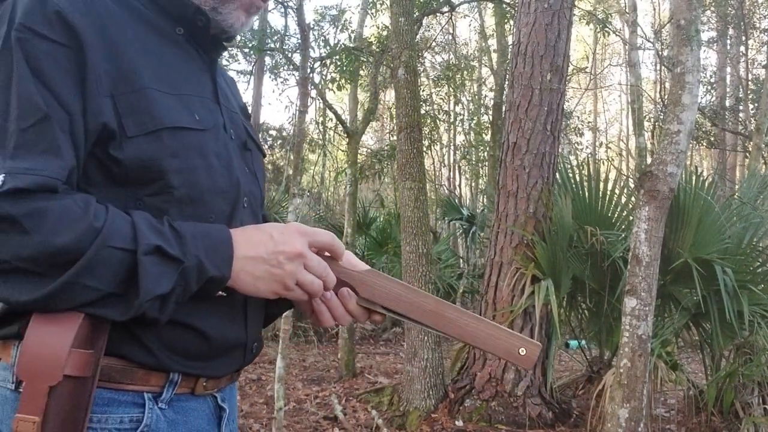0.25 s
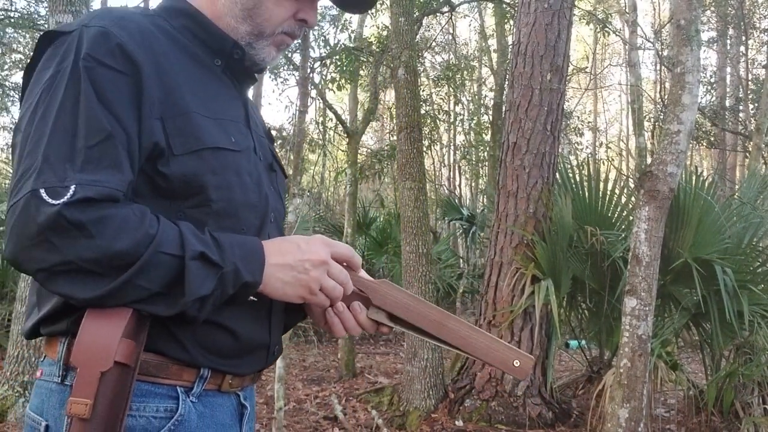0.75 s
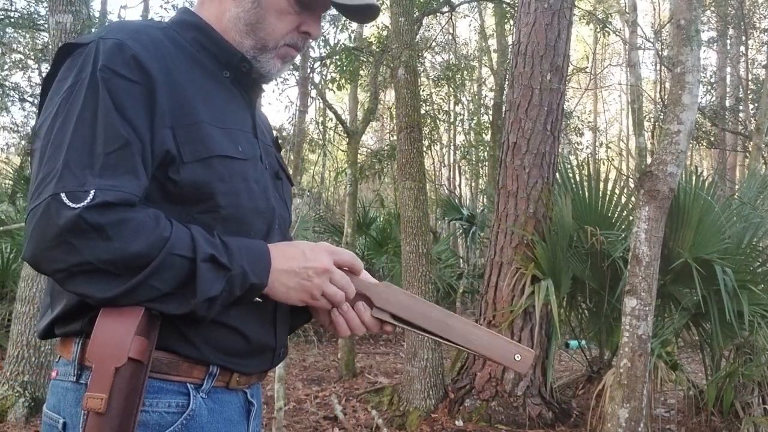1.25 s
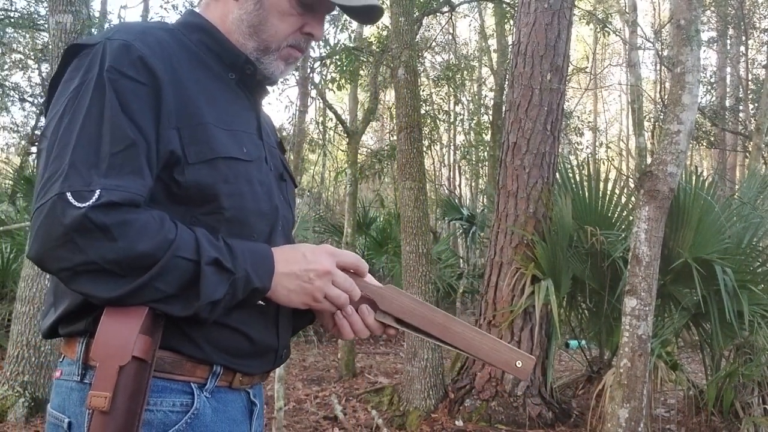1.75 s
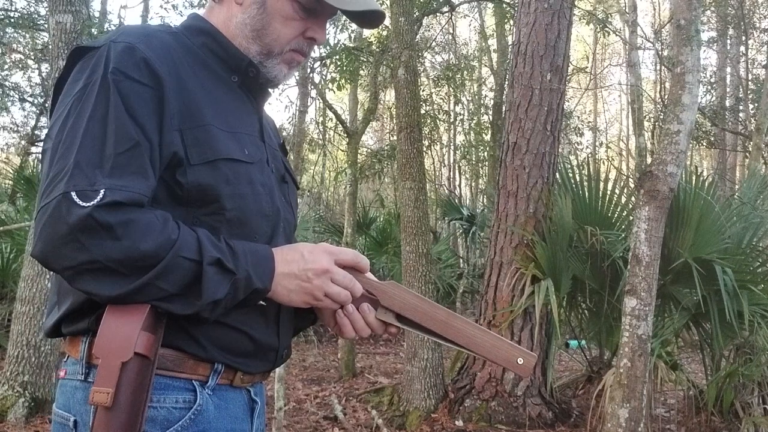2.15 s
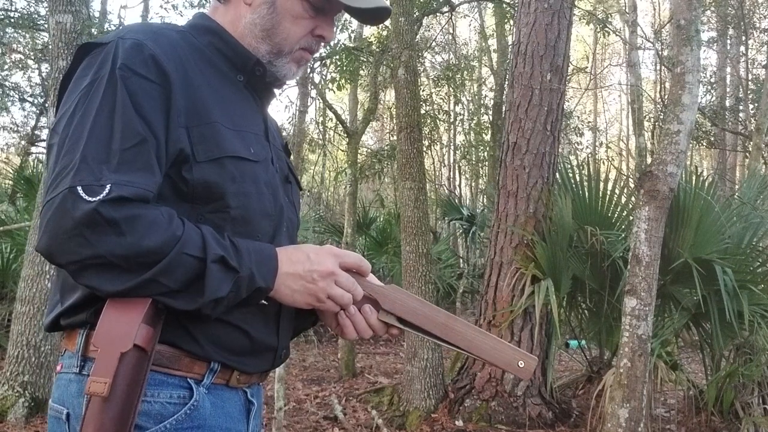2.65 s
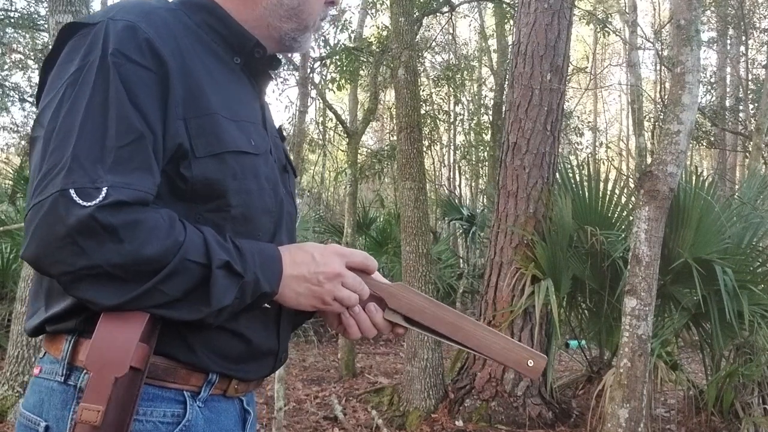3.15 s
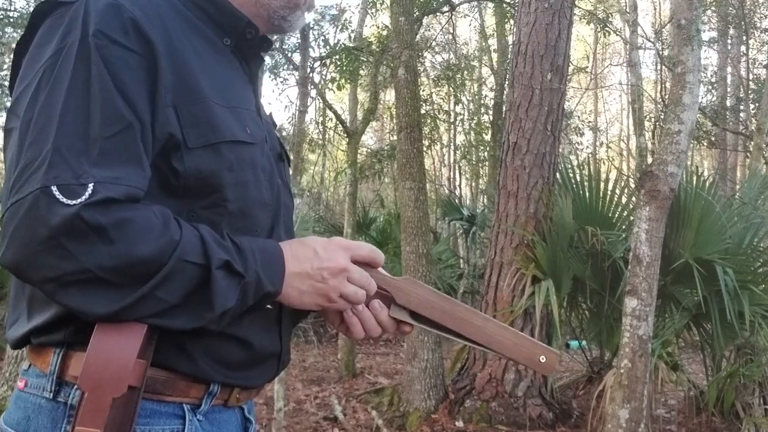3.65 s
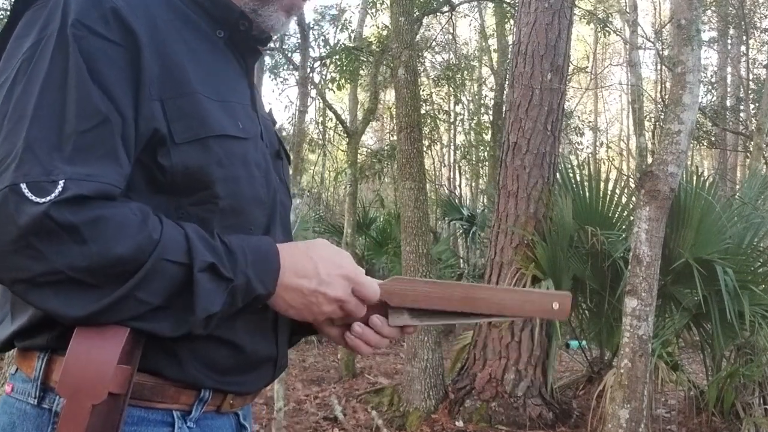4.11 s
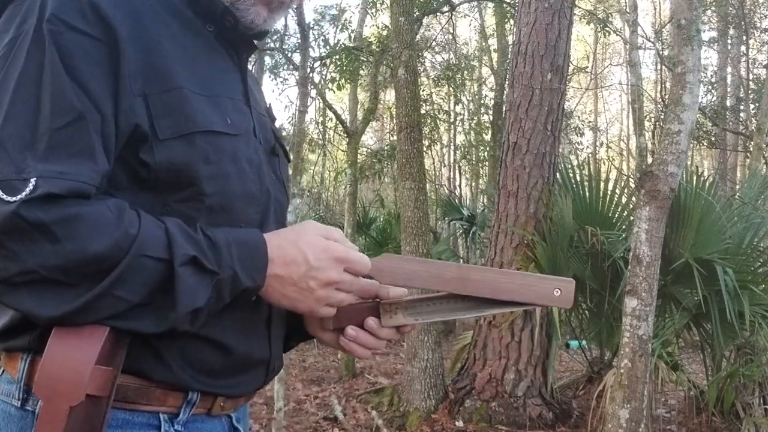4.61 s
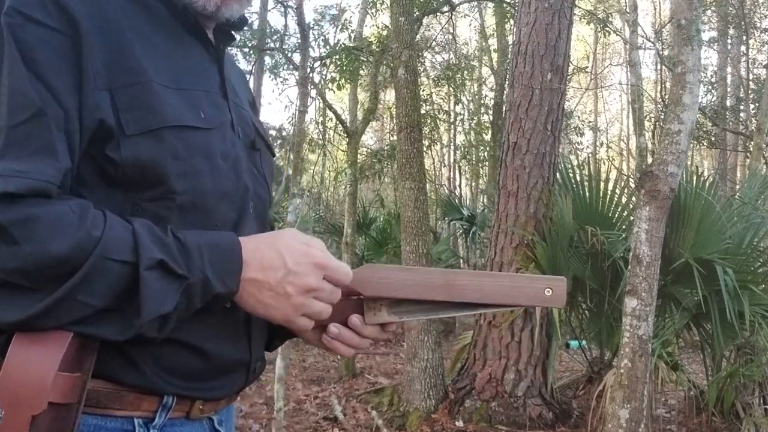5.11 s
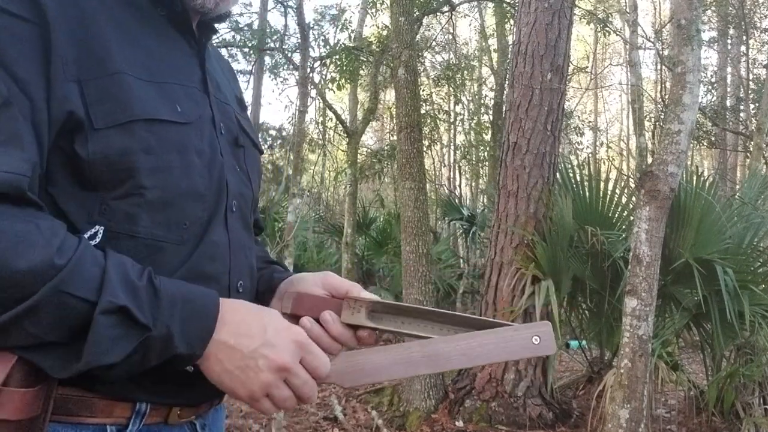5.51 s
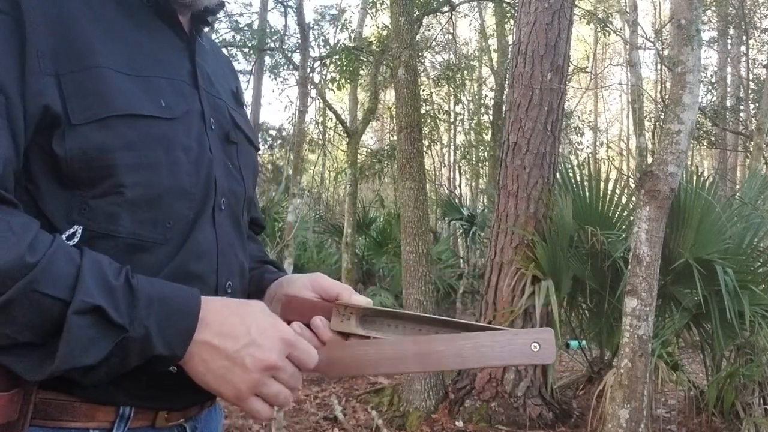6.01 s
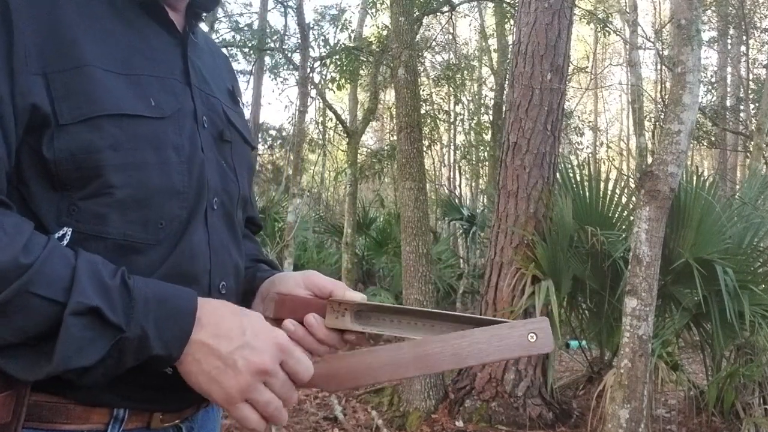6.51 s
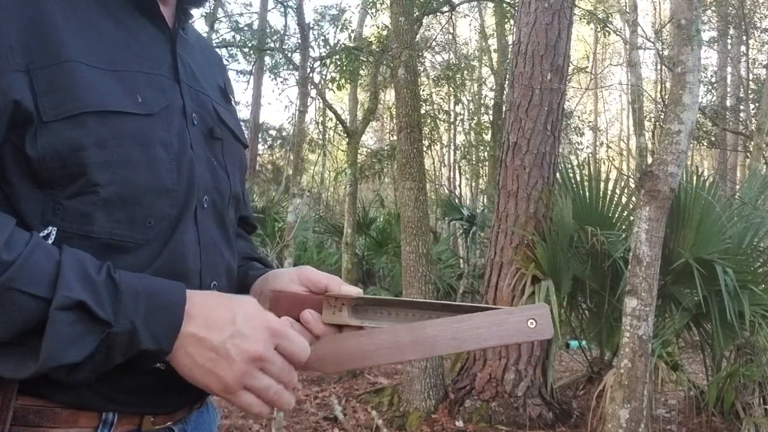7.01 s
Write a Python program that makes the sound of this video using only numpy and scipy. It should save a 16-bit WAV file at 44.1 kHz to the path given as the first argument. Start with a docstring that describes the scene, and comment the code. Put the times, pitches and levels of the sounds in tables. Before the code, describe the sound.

A wooden box call is played close by in a quiet forest with faint insects and low distant traffic. Short, bright, hollow clucks come singly with pauses between; light wooden taps follow as the lid is shifted. Then squeaky yelps begin, first uneven, then regular at about three or four a second, each sliding from a high catch into a clear note and a rasp. Close stereo outdoor pickup, short echoes off trees.

```python
"""A quiet wood: distant traffic rumbles and insects sing as shaped noise; faint bird whistles and dry ticks.
From one second a chalked paddle lid scrapes over the lip of a wooden turkey box call in short clucks.
It sticks and slips about a thousand times a second, and each slip rings the modes of the box.
After a few taps come yelps: a high catch glides into a clear note, and most break into a half-rate rasp.
The lid drags back between yelps, as grain noise through the box; noise echoes stand for the trees."""
import sys
import numpy as np
from scipy import signal
from scipy.fft import rfft, irfft, next_fast_len
from scipy.io import wavfile
from scipy.ndimage import uniform_filter1d

SR = 44100
rng = np.random.default_rng(int(sys.argv[2]) if len(sys.argv) > 2 else 0)


def materialize(psi):
    """Save the field psi as 16-bit PCM at rate SR to the path in sys.argv[1].

    A 1-D psi becomes a single channel; in a 2-D psi each row is a channel.
    """
    bounded = np.clip(np.atleast_2d(psi).T, -1, 1)
    quanta = np.round(bounded * 32767).astype(np.int16)
    wavfile.write(sys.argv[1], SR, quanta)


N = 320166
LEAD_IN = 8820      # samples before time zero, so that earlier sounds can leave echoes
SILENT_DB = -65.5   # level at which a stroke starts and ends


def from_db(db):
    """Gain of a level in dB."""
    return 10 ** (np.asarray(db) / 20)


def rms_one(x):
    """Scaled to rms 1."""
    return x / np.sqrt(np.mean(x ** 2) + 1e-20)


def at_hz(points, hz):
    """A table read on a log-frequency axis, held flat beyond its ends."""
    table_hz, values = np.array(points).T
    return np.interp(np.log(hz + 1), np.log(table_hz), values)


def panned(x, pan_db):
    """Left raised and right lowered by half the difference."""
    return x * from_db([[pan_db / 2], [-pan_db / 2]])


def filtered(x, order, hz, kind="low"):
    """Butterworth filter run forward in time."""
    return signal.sosfilt(signal.butter(order, hz, kind, fs=SR, output="sos"), x)


def wander(size, cut_hz):
    """Low-passed noise of spread 1."""
    return rms_one(filtered(rng.standard_normal(size), 2, cut_hz))


def evened(x, window_s=0.0042):
    """Divided by its running loudness."""
    power = uniform_filter1d(x.mean(axis=0) ** 2, int(window_s * SR))
    return x / np.sqrt(np.maximum(power, 0) + 1e-12)


def fade(t, s, level_db):
    """Level curve with rounded rises and falls, silent outside the stroke."""
    return np.interp(t, s, from_db(level_db / 2), left=0, right=0) ** 2


def add(out, sound, s):
    """Mixes a sound into a buffer that starts LEAD_IN samples before time zero."""
    i = round(s * SR) + LEAD_IN
    sound = sound[:, :out.shape[1] - i]
    out[:, i:i + sound.shape[1]] += sound


# how alike the two ears hear the background. Each row: frequency in Hz, left-right correlation 0-1
EAR_LIKENESS = [(60, 0.99), (130, .94), (290, 0.28), (640, 0.83), (1400, 0.39)]


def coloured(spectrum):
    """Steady stereo noise, its left-right likeness set per frequency; rms 1 in the middle."""
    hz = np.arange(N // 2 + 1) * SR / N
    alike = np.clip(at_hz(EAR_LIKENESS, hz), -1, 1)
    mid, side = rfft(rng.standard_normal((2, N))) * from_db(at_hz(spectrum, hz))
    pair = irfft(np.sqrt(1 + alike) * mid + np.sqrt(1 - alike) * side * [[1], [-1]], N)
    return pair / np.sqrt(np.mean(pair.mean(axis=0) ** 2))


# rise and fall of the background. Each row: time in seconds, rumble level in dB
RUMBLE_LEVELS = [(0, -56), (.6, -59), (1.33, -58), (1.98, -59), (2.77, -53.5), (4.53, -53), (4.95, -50.5),
                 (5.5, -58), (5.78, -56), (6.3, -54.5), (7.26, -55)]
# spectra of traffic, air and insects. Each row: frequency in Hz, relative density in dB per Hz
RUMBLE_SPECTRUM = [(12, -50), (20, -25.5), (29, -16.5), (50, -4.5), (76, 1), (125, -3), (188, -18.5),
                   (279, -23.5), (350, -36), (460, -65), (770, -120)]
AIR_SPECTRUM = [(150, -16.5), (250, -2), (507, -8.5), (557, -7.5), (662, -6.5), (855, -5.5), (1310, -2.5),
                (1900, -15.5), (4000, -23.5), (5200, -56), (8800, -120)]
INSECT_SPECTRUM = [(2100, -72), (3500, -42.5), (4050, -18.5), (4550, -6), (4950, -1), (5300, -7),
                   (5750, -24), (6600, -20.5), (7600, -32.5), (8800, -26), (9800, -26), (10900, -27),
                   (13000, -28), (15800, -34.5)]
RUMBLE_PAN_DB = -1.2
AIR_DB, AIR_FOLLOWS = -70, .6   # mean level; share of the rumble's swing in dB
INSECTS_DB, INSECTS_FOLLOW = -61, .9


def background():
    """Traffic rumble that swells, air, and an insect chorus that flutters a little: three shaped noises."""
    s, rumble_db = np.transpose(RUMBLE_LEVELS)
    swing_db = rumble_db - rumble_db.mean()
    levels_db = rumble_db, AIR_DB + AIR_FOLLOWS * swing_db, INSECTS_DB + INSECTS_FOLLOW * swing_db
    rumble, air, insects = [from_db(np.interp(np.arange(N) / SR, s, db)) for db in levels_db]
    swell = from_db(1.5 * wander(N, 5))
    flutter = from_db(1.5 * wander(N, 60))
    traffic = panned(rumble * swell * coloured(RUMBLE_SPECTRUM), RUMBLE_PAN_DB)
    chorus = insects * flutter * coloured(INSECT_SPECTRUM)
    return traffic + air * coloured(AIR_SPECTRUM) + chorus


# reverberation of the wood. Each row: frequency in Hz, time to fall 60 dB in seconds
WOOD_T60 = [(500, 0.35), (1000, 0.35), (2000, 0.65), (4000, 0.6), (8000, 0.65), (14000, .5)]
WOOD_DB, EARLY_DB, EARLY_T60_S = -23.5, -14.5, 0.14


def wood(x):
    """Scattering off trunks: nearby echoes die fast, far ones slowly, each octave at its own rate."""
    t = np.arange(SR) / SR
    onset = np.clip(t / 0.0057, 0, 1)
    early = from_db(EARLY_DB - 60 * t / EARLY_T60_S) * rng.standard_normal((2, SR))
    echoes = early / np.sqrt(EARLY_T60_S * SR / 14)
    edges = 350 * 2 ** np.arange(0, 6.0)
    for low, high in zip(edges, np.minimum(edges * 2, 18000)):
        band = filtered(rng.standard_normal((2, SR)), 2, [low, high], "band")
        decay_db = -60 * t / at_hz(WOOD_T60, np.sqrt(low * high))
        echoes = echoes + from_db(WOOD_DB + decay_db) * band / np.sqrt(SR / 14)
    return signal.fftconvolve(x, echoes * onset, axes=1)[:, :x.shape[1]]


# a distant bird. Each row: start in seconds, peak level in dB before the echoes
BIRD_NOTES = [(.98, -81.5), (1.42, -76), (1.93, -76)]
BIRD_FROM_HZ, BIRD_TO_HZ = 6400, 7800


def bird(out):
    """Thin far whistles: a sine whose pitch rises quickly, then more slowly."""
    t = np.arange(round(.06 * SR)) / SR
    hz = BIRD_FROM_HZ + (BIRD_TO_HZ - BIRD_FROM_HZ) * np.sqrt(t / t[-1])
    whistle = np.hanning(len(t)) * np.sin(2 * np.pi * np.cumsum(hz) / SR + [[0], [1.5]])
    for s, level_db in BIRD_NOTES:
        add(out, from_db(level_db) * whistle, s)


# dry ticks in the undergrowth. Each row: start in seconds, gain in dB on the filtered noise
UNDERGROWTH_TICKS = [(0.4344, -55), (0.5586, -56), (0.7312, -61), (2.2523, -70), (2.809, -30),
                     (2.8394, -40)]
TICK_BAND_HZ = 4581.5, 4819.5


def ticks(out):
    """Short bright crackles: decaying noise in a narrow band, unrelated in the two ears."""
    t = np.arange(900) / SR
    for s, gain_db in UNDERGROWTH_TICKS:
        burst = rng.standard_normal((2, len(t))) * np.exp(-t / 0.0088)
        add(out, from_db(gain_db) * filtered(burst, 1, TICK_BAND_HZ, "band"), s)


def small_modes(size, share, ring_s):
    """Many short-lived modes, strongest in the treble, ripple the response, differently on each side."""
    ring = np.diff(rng.standard_normal((2, 600)))
    ring = ring * np.exp(-np.arange(ring.shape[1]) / SR / ring_s)
    return 1 + share * rfft(ring / np.sqrt((ring ** 2).sum(axis=1, keepdims=True)), size)


# modes of box and lid. Each row: frequency in Hz, width in Hz, level in dB,
# left minus right in dB, left phase lead in radians
BOX_MODES = [(533, 60, -39.5, -3, 0.077), (905, 130, -16, 0.5, 0.19), (1003, 170, -16, 2.5, 0.25),
             (1411, 280, -2.5, -1, .3), (1984, 340, -9, 6.5, 0.067), (2119, 220, -2, 2, -0.038),
             (2403, 610, -11, -1, -0.31), (2905, 260, -6, 2.5, 0.29), (3387, 360, -11.5, 5.5, -0.011),
             (3716, 380, -10, 3.5, 0.19), (4770, 1100, -16, 6.5, 0.23), (5784, 610, -11, 7.5, 0.033),
             (7750, 540, -31, 11, -0.18), (8530, 800, -30.5, 4.5, 0.035), (12300, 1700, -59.5, 4, .1)]
LEFT_LEAD_S = 1e-4


def through_box(force):
    """The force rings every mode; each mode radiates differently to the two microphones."""
    size = next_fast_len(len(force) + 2048)
    hz, response = np.arange(size // 2 + 1) * SR / size, 0
    side = np.array([[.5], [-.5]])
    for k, (mode_hz, width_hz, level_db, pan_db, lead) in enumerate(BOX_MODES):
        detuning = (hz ** 2 - mode_hz ** 2) / (np.maximum(hz, 1) * width_hz)
        peak = (-1) ** k / (1 + 1j * detuning) ** 1.308   # neighbours alternate in sign
        response = response + from_db(level_db + side * pan_db) * np.exp(1j * side * lead) * peak
    response = response * small_modes(size, share=1.0, ring_s=0.0099)
    response = response * np.exp(2j * np.pi * hz * side * LEFT_LEAD_S)
    return irfft(rfft(force, size) * response, size)[:, :len(force)]


BUMP_S, BUMP_DB = 5.368, -48   # start; peak level


def bump(out):
    """A dull thud of the hand against the box: decaying low-mid noise."""
    t = np.arange(1500) / SR
    thud = filtered(rng.standard_normal(len(t)), 2, [180, 800], "band") * np.exp(-t / 0.011)
    add(out, from_db(BUMP_DB) * np.array([thud, thud]) / np.abs(thud).max(), BUMP_S)


# the lid touching the box. Each row: start in seconds, peak level in dB, softness 0-1
LID_TAPS = [(3.922, -55, .6), (3.998, -37.5, .6), (4.133, -49, 1), (5.444, -39, 0.79), (5.472, -38.5, 0.67)]


def taps(out):
    """Wooden contacts a few milliseconds long; softness low-passes the force so mainly low modes ring."""
    t = np.arange(1500) / SR
    for s, peak_db, soft in LID_TAPS:
        force = rng.standard_normal(len(t)) * np.exp(-t / 0.0066)
        r = np.clip(soft, 0, .99)
        sound = through_box(signal.lfilter([1], [1, -2 * r, r * r], force))
        add(out, from_db(peak_db) * sound / np.abs(sound.mean(axis=0)).max(), s)


# the lid dragged back lightly. Each row: start in seconds, rise in seconds, fall in seconds,
# top level in dB, centre of the driven band in Hz
LID_DRAGS = [(4.217, .008, 0.035, -49, 2250), (4.26, 0.018, .11, -55, 2200),
             (4.57, 0.069, 0.053, -48.5, 2190), (4.88, 0.079, 0.054, -40.5, 2110),
             (5.47, 0.0033, 0.16, -58, 2100), (5.83, 0.065, 0.039, -52, 2000),
             (6.111, 0.063, 0.06, -44, 1720), (6.399, 0.061, 0.051, -39, 1790),
             (6.678, 0.055, 0.068, -38, 1630), (6.97, 0.055, .072, -39, 1660), (7.24, .05, .05, -46, 1600)]
DRAG_START_DB, DRAG_END_DB = -17.5, -77   # relative to the top; absolute
DRAG_SPAN = 1.3   # the band driven reaches this factor above and below the centre


def drags(out):
    """Chalk grains catch at random; so light a touch rings mainly the middle modes."""
    for start, rise, fall, top_db, centre_hz in LID_DRAGS:
        s = np.array([start, start + rise, start + rise + fall])
        level_db = np.array([top_db + DRAG_START_DB, top_db, DRAG_END_DB])
        t = np.arange(s[0] - .02, s[-1] + 0.029, 1 / SR)
        caught = rng.random(len(t)) < 2500.0 / SR   # 2500 grains per second on average
        grains = rng.standard_normal(len(t)) * caught
        middle = filtered(grains, 2, [centre_hz / DRAG_SPAN, centre_hz * DRAG_SPAN], "band")
        add(out, rms_one(through_box(middle + 0.32 * grains)) * fade(t, s, level_db), t[0])


def stroke(rows, colour, shimmer, jitter):
    """Stick-slip pulses ring the box; roughness makes the slips uneven in time and strength."""
    # each row: time in seconds, slips per second, level in dB, bite (share above 2.4 kHz) in dB,
    # unevenness of slip pairs, roughness
    s, per_s, level_db, *controls = np.transpose(rows)
    t = np.arange(s[0] - .02, s[-1] + 0.0092, 1 / SR)
    bite_db, skip, rough = [np.interp(t, s, c) for c in controls]
    wobble = 1 + 0.003 * wander(len(t), 60)     # the hand's speed is never quite even
    # phase of a pair of slips: odd partials sound only when the two slips differ
    phase = np.pi * np.cumsum(np.interp(t, s, per_s) * wobble) / SR
    phase = phase + jitter * rough * wander(len(t), 140)
    order = np.arange(1, int(33000 / per_s.max()) + 1)[:, None]
    partials = np.cos(order * phase + 0.066 * order ** 2)   # a slip takes time: partials come spread out
    partials = partials * from_db(at_hz(colour, order * per_s.mean() / 2))
    slips = partials[1::2].sum(axis=0) + np.clip(skip, 0, 3) * partials[::2].sum(axis=0)
    sound = through_box(slips * (1 + shimmer * rough * wander(len(t), 400)))
    low = signal.sosfiltfilt(signal.butter(6, 2400, fs=SR, output="sos"), sound)
    bite = np.minimum(from_db(bite_db), .97)
    body = np.sqrt(1 - bite ** 2) * evened(low) + bite * evened(sound - low)
    return body * fade(t, s, level_db), t[0]


EVEN = 0.016   # unevenness of slip pairs in a steady note
CATCH_S, CATCH_BITE_DB, TURN_S = .0035, -8.5, 0.0052   # catch; lead into the middle of the note
CATCH_SKIP, CATCH_ROUGH, CLUCK_ROUGH = 0.22, .45, 0.045   # uneven at first, then steady
LET_GO_S, LET_GO_DB, LET_GO_RISE, DIE_S = .006, -18.5, 1.04, .011   # the lid slides off, briefly faster


def cluck(s, length, share, first, middle, last, early_db, middle_db, last_db, bite_db, last_bite_db):
    """Stroke rows of a short jerk of the lid: rough catch, short note, quick let-go."""
    mid, end = s + share * length, s + length
    steady = max(mid - TURN_S, s + CATCH_S + 0.003)
    steady_db, steady_bite_db = (early_db + middle_db) / 2, (CATCH_BITE_DB + bite_db) / 2
    return [(s, first, SILENT_DB, CATCH_BITE_DB, CATCH_SKIP, CATCH_ROUGH),
            (s + CATCH_S, first, early_db, CATCH_BITE_DB, CATCH_SKIP * .65, CATCH_ROUGH * 0.61),
            (steady, first, steady_db, steady_bite_db, CATCH_SKIP * .25, CLUCK_ROUGH * 1.3),
            (mid, middle, middle_db, bite_db, EVEN, CLUCK_ROUGH),
            (end, last, last_db, last_bite_db, EVEN, CLUCK_ROUGH),
            (end + LET_GO_S, last * LET_GO_RISE, last_db + LET_GO_DB, last_bite_db, EVEN, CLUCK_ROUGH),
            (end + LET_GO_S + DIE_S, last, SILENT_DB, last_bite_db, EVEN, CLUCK_ROUGH)]


# clucks; the first ends before time zero and leaves only its echoes. Each row: start in seconds,
# length in seconds, place of the middle as share of the length, slips per second (first, middle, last),
# level in dB (early, middle, last), share above 2.4 kHz in dB (middle, last), treble tilt in dB per octave
CLUCK_STROKES = [(-.12, 0.023, 0.44, 890, 870, 976, -9.5, -9, -10.5, -6, -9, 11),
                 (1.0145, 0.026, 0.31, 844, 903, 929, -18.5, -17, -15, -1.5, -12.5, 4.5),
                 (1.2489, 0.027, 0.63, 875, 836, 894, -17, -15.5, -14, -1, -8, 4),
                 (2.353, .018, 0.34, 980, 810, 866, -20.5, -23, -16.5, -3.5, -6, 9.5),
                 (3.184, 0.015, 0.88, 836, 895, 930, -21, -16, -19, -7, -13, 1),
                 (3.7406, 0.011, 0.5, 900, 880, 860, -24, -16.5, -15, -10, -8, 0.5)]
# the box held closed and tipped away. Each row: frequency in Hz, relative level in dB
CLOSED_COLOUR = [(800, -4), (1100, 7), (1800, 0.7), (2600, 5.5), (3500, 6.5), (6000, 0.5), (12000, -6)]
CLUCK_PAN_DB, TILT_FROM_HZ = -1, 3500


def clucks(out):
    """Short strokes on the closed box, each with its own treble tilt."""
    for *row, tilt_db in CLUCK_STROKES:
        colour = [(hz, db + tilt_db * max(np.log2(hz / TILT_FROM_HZ), 0)) for hz, db in CLOSED_COLOUR]
        sound, s = stroke(cluck(*row), colour, shimmer=1.4, jitter=0.23)
        add(out, panned(sound, CLUCK_PAN_DB), s)


ATTACK_S, HIGH_SWELL_DB_PER_S = .007, 222.5
ATTACK_BITE_DB_PER_S = 400   # the treble grows through the high part
GLIDE_S, SAG_PER_S2 = 0.0087, 600   # time constant of the glide; the clear note keeps sagging
FALTER_S = 0.0093   # the note falters in mid-glide
FALTER_BITE_DB, CLEAR_ROUGH = -1, .028   # bite relative to the clear note
# part of the clear level is back; all of it at this share of the way to the break
REGAIN_S, REGAIN, FULL_AT = 0.023, 0.52, 0.76
BREAK_S, SETTLE_S, BREAK_ROUGHER = .008, .009, 1.3
BREAK_BITE_DB, LAST_BITE_DB = 3.5, -1.5   # relative to the rasp
TIRING, TIRE_DB = 0.41, -6   # share of the fade-out in which the stroke tires, before it stops


def yelp(s, glide, crack, length, fade_s, high, clear, rasp, last, high_db, glide_db, clear_db, rasp_db,
         high_bite_db, clear_bite_db, rasp_bite_db, skip, rough):
    """Stroke rows of a long stroke: high catch, faltering glide, swelling clear note, break, rasp, release."""
    attack = min(ATTACK_S, glide - .001)
    attack_db = high_db - HIGH_SWELL_DB_PER_S * (glide - attack)
    dark_db = high_bite_db - ATTACK_BITE_DB_PER_S * (glide - attack)
    regain_db = glide_db + REGAIN * (clear_db - glide_db)
    full = max(glide + FULL_AT * (crack - glide), glide + REGAIN_S + .002)
    front = [(0, SILENT_DB, dark_db),
             (attack, attack_db, dark_db),
             (glide, high_db, high_bite_db),
             (glide + FALTER_S, glide_db, clear_bite_db + FALTER_BITE_DB),
             (glide + REGAIN_S, regain_db, clear_bite_db),
             (full, clear_db, clear_bite_db),
             (crack, clear_db, clear_bite_db)]
    settled = clear + SAG_PER_S2 * (crack - glide)
    rows = []
    for t, db, bite_db in front:
        gliding = max(t - glide, 0)
        per_s = settled + (high - settled) * np.exp(-gliding / GLIDE_S) - SAG_PER_S2 * gliding
        rows.append((s + t, per_s, db, bite_db, EVEN, CLEAR_ROUGH))
    broken = s + crack + BREAK_S
    rows += [(broken, clear, rasp_db, rasp_bite_db + BREAK_BITE_DB, skip, rough * BREAK_ROUGHER),
             (broken + SETTLE_S, rasp, rasp_db, rasp_bite_db, skip, rough)]
    tiring = s + length - fade_s
    last_bite_db = rasp_bite_db + LAST_BITE_DB
    return [row for row in rows if row[0] < tiring] + [
        (tiring, rasp, rasp_db, rasp_bite_db, skip, rough),
        (tiring + TIRING * fade_s, last, rasp_db + TIRE_DB, last_bite_db, skip, rough),
        (s + length, last, SILENT_DB, last_bite_db, skip, rough)]


# yelps; the rasp comes where the lid skips every other slip. Each row: start in seconds, then counted
# from it in seconds the glide, the break and the end, fade-out in seconds,
# slips per second (high, clear, rasp, last), level in dB (high, in the glide, clear, rasp),
# share above 2.4 kHz in dB (high, clear, rasp), unevenness of slip pairs 0-3, roughness of the rasp 0-1
YELP_STROKES = [(4.469, 0.013, .052, 0.079, 0.006, 1060, 1004, 1074, 1020, -23.5, -25.5, -21, -25, -25, -7.5, -9.5, 0.0095, 0.01),
                (4.735, 0.041, .09, 0.13, 0.028, 1072, 980, 954, 995, -13, -17, -16.5, -19.5, -13.5, -3.5, -5, 0.33, 0.08),
                (5.051, 0.028, .082, .15, .036, 1080, 968, 1126, 986, -16, -19, -14, -14.5, -17, -4, -12.5, 1.14, 0.18),
                (5.699, 0.021, .062, 0.13, 0.039, 1030, 1010, 1030, 995, -32.5, -36.5, -32, -33.5, -20, -14, -10.5, 0.024, 0.07),
                (5.956, 0.0076, 0.09, 0.15, 0.028, 1075, 939, 960, 1010, -24.5, -28.5, -18.5, -15.5, -14.5, -5.5, -14.5, 2.1, 0.13),
                (6.257, 0.0074, 0.074, 0.13, 0.035, 1093, 943, 940, 1080, -22.5, -27.5, -16, -16.5, -12, -6, -9, 1.1, 0.36),
                (6.531, 0.0091, .078, 0.14, 0.031, 1119, 960, 1065, 1090, -22, -29, -13, -14, -8.5, -5.5, -10, 1.8, 0.31),
                (6.815, 0.0072, 0.071, 0.14, 0.041, 1120, 946, 1000, 1050, -18.5, -26, -13.5, -13.5, -10.5, -6, -11, 1.6, 0.24),
                (7.114, 0.0058, .063, 0.12, 0.038, 1123, 958, 930, 1160, -21.5, -25, -14.5, -15.5, -6.5, -5.5, -9.5, 1.36, 0.46)]
# the lid swung open. Each row: frequency in Hz, relative level in dB
OPEN_COLOUR = [(500, -3.5), (1000, -3), (2000, 7.3), (4000, -4), (6500, -2.5), (12000, -7)]


def yelps(out):
    """Long strokes on the open box."""
    for row in YELP_STROKES:
        add(out, *stroke(yelp(*row), OPEN_COLOUR, shimmer=0.7, jitter=0.75))


YELP_ECHO_DB, YELP_ECHO_HZ = -0.5, 2500   # the open box throws less, and duller, at the trunks
BIRD_ECHO_DB = 25.0   # the bird is heard mostly through its echoes


def scene():
    """Box call, its echoes and the wood around it."""
    near, opened, far = np.zeros((3, 2, N + LEAD_IN))
    bird(far)
    for source in (ticks, bump, taps, drags, clucks):
        source(near)
    yelps(opened)
    dull = filtered(opened, 1, YELP_ECHO_HZ)
    echoes = wood(near + from_db(YELP_ECHO_DB) * dull + from_db(BIRD_ECHO_DB) * far)
    return (near + opened + echoes + far)[:, LEAD_IN:] + background()


# balance of the microphones. Each row: frequency in Hz, left minus right in dB
MICROPHONE_BALANCE = [(5500, 2.5), (7500, -1), (14000, 0.5)]
CEILING, CUTOFF_HZ = .97, 16300


def record(dry):
    """The left-right balance varies with frequency; the highest peaks are rounded, the top is cut."""
    hz = np.arange(N // 2 + 1) * SR / N
    balance = from_db(at_hz(MICROPHONE_BALANCE, hz) * [[.5], [-.5]])
    tilted = irfft(rfft(dry) * balance, N)
    rounded = CEILING * tilted / (CEILING ** 6 + tilted ** 6) ** (1 / 6)
    return signal.sosfilt(signal.cheby2(18, 90, CUTOFF_HZ, fs=SR, output="sos"), rounded)


dry = scene()
out = record(dry)
materialize(out)
```